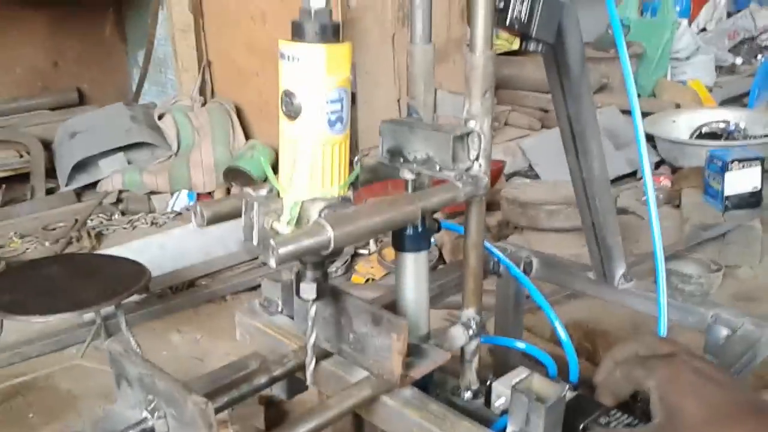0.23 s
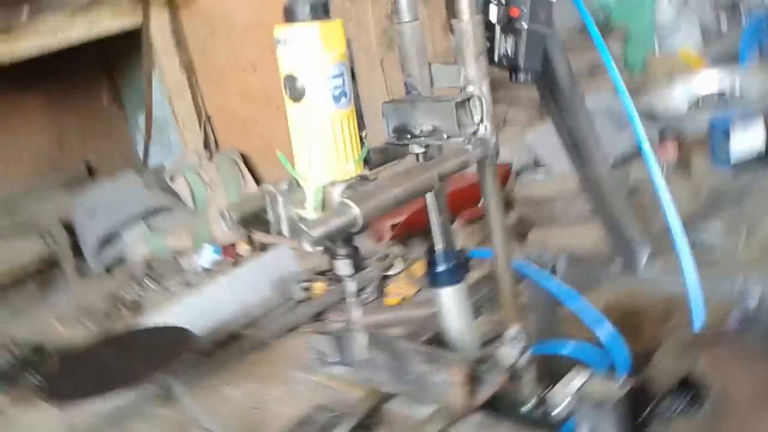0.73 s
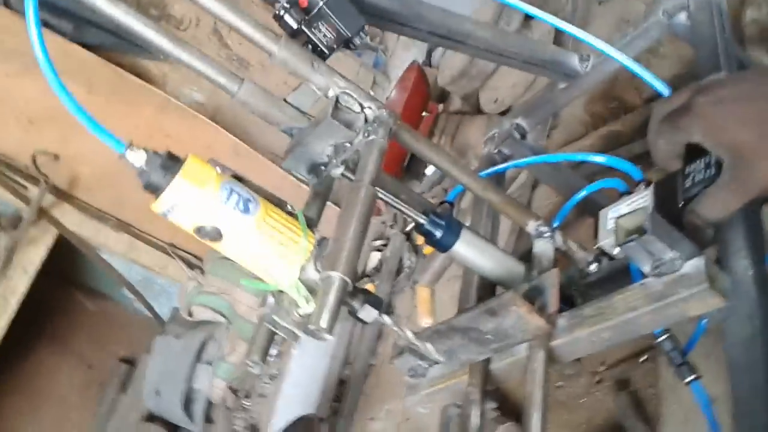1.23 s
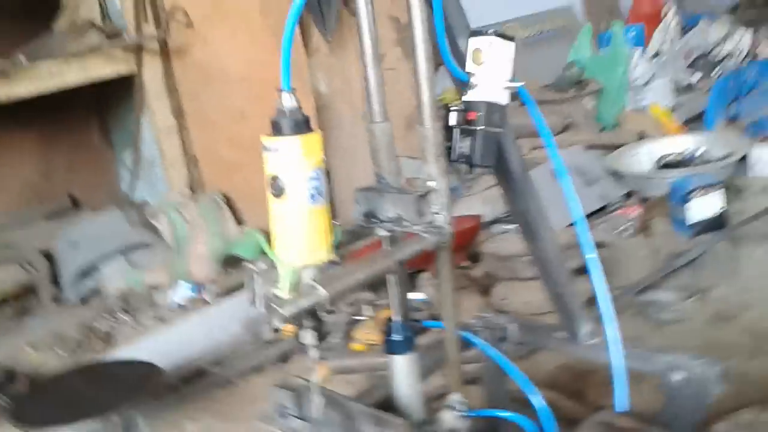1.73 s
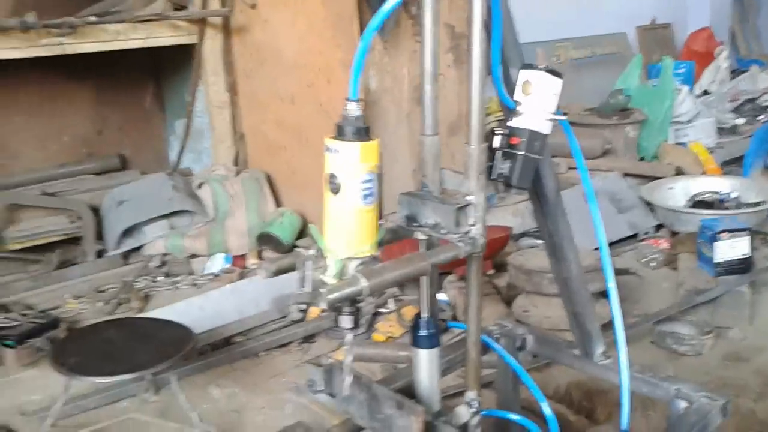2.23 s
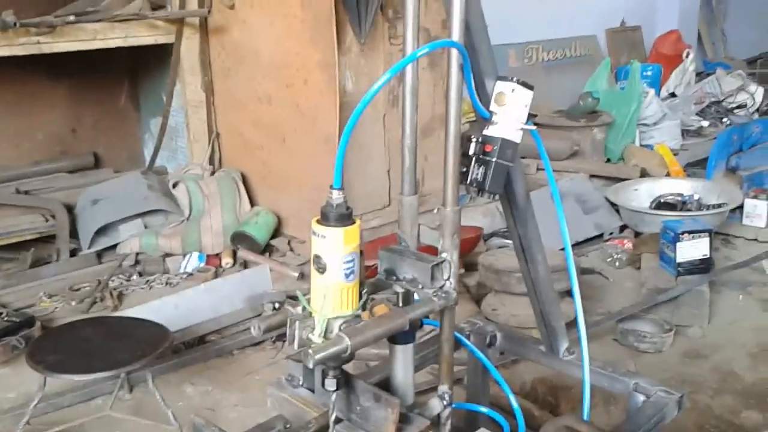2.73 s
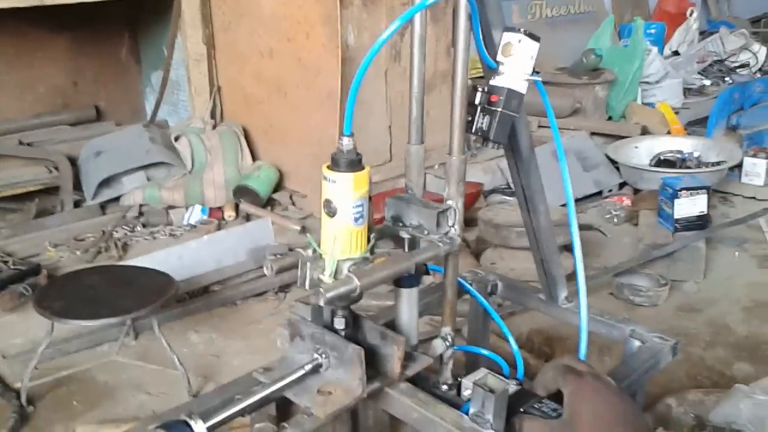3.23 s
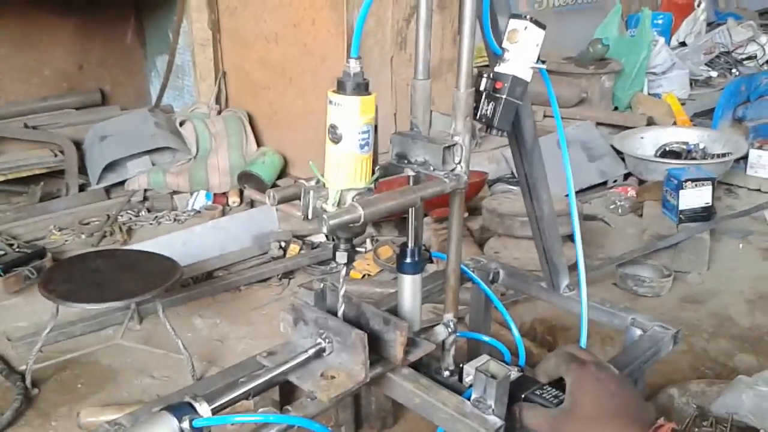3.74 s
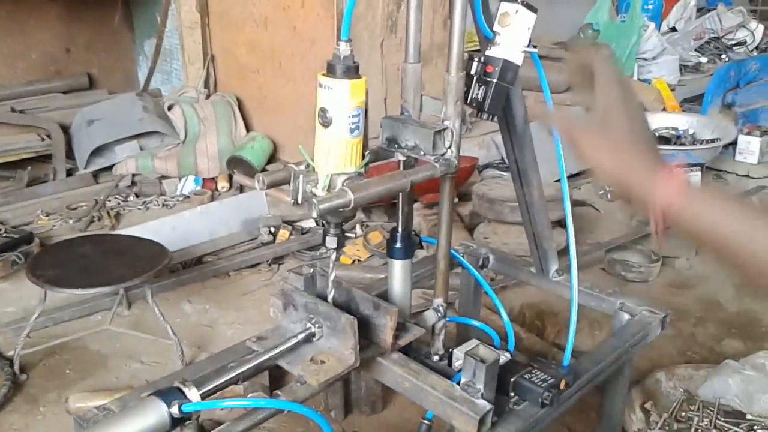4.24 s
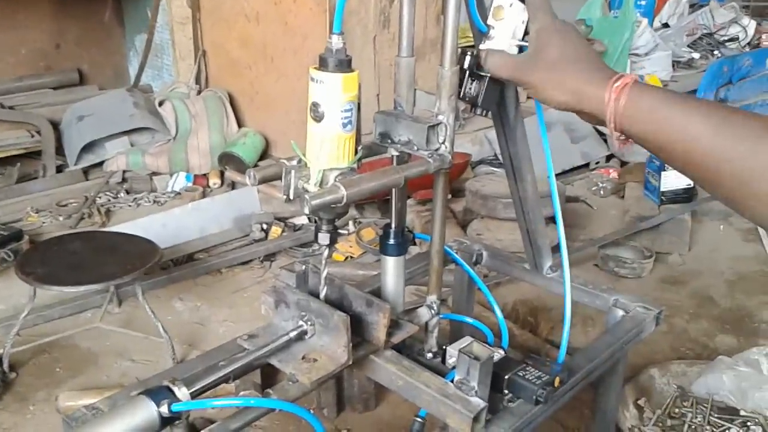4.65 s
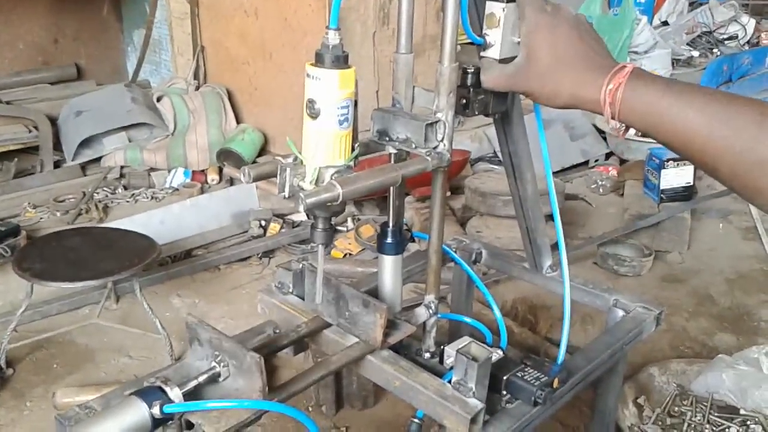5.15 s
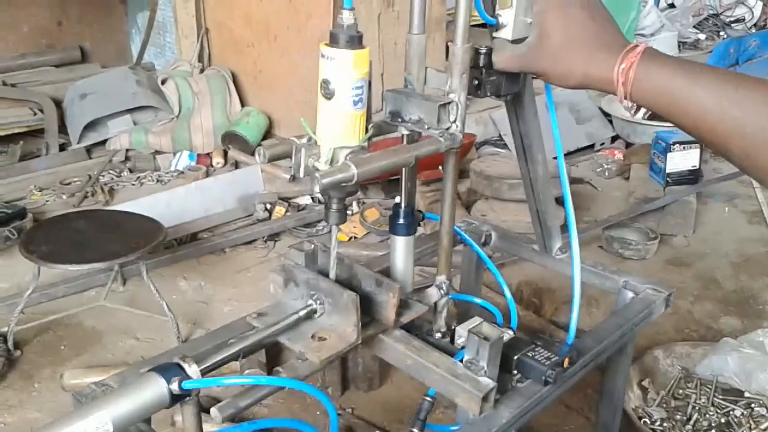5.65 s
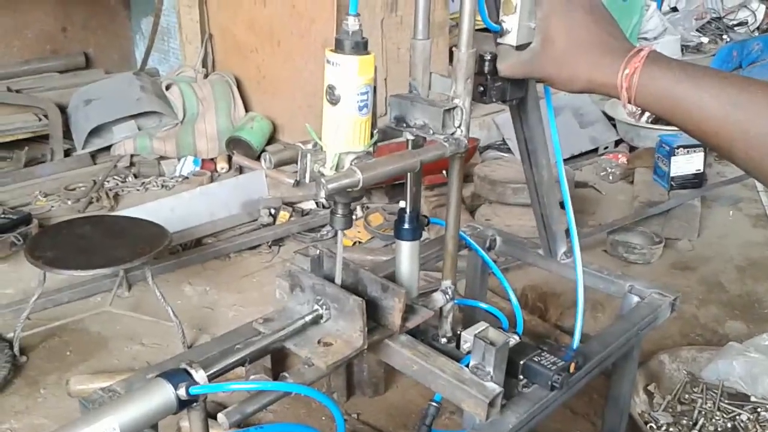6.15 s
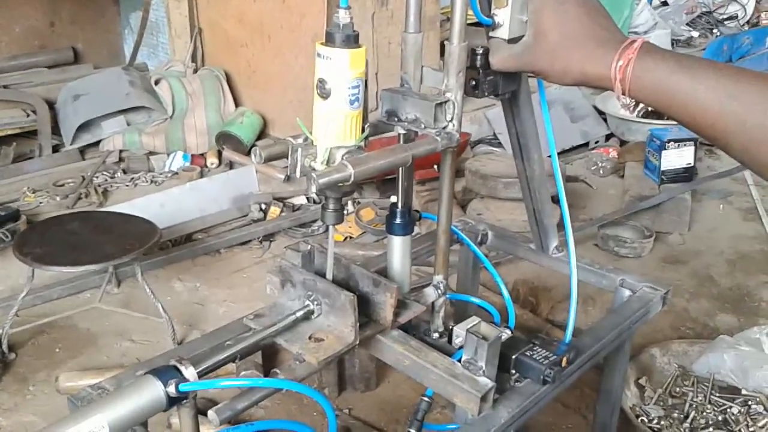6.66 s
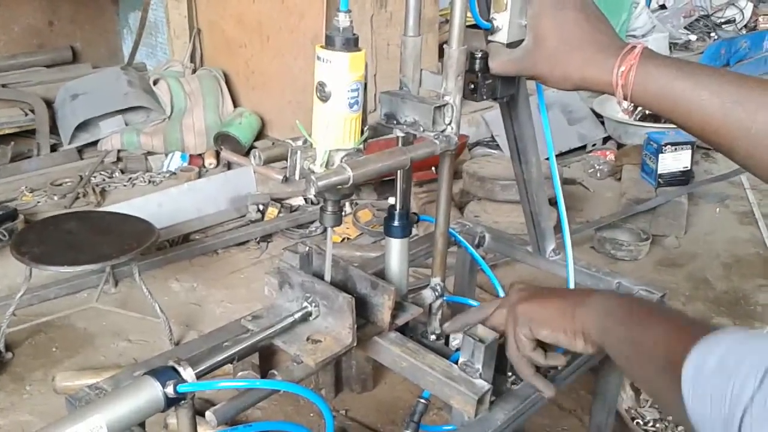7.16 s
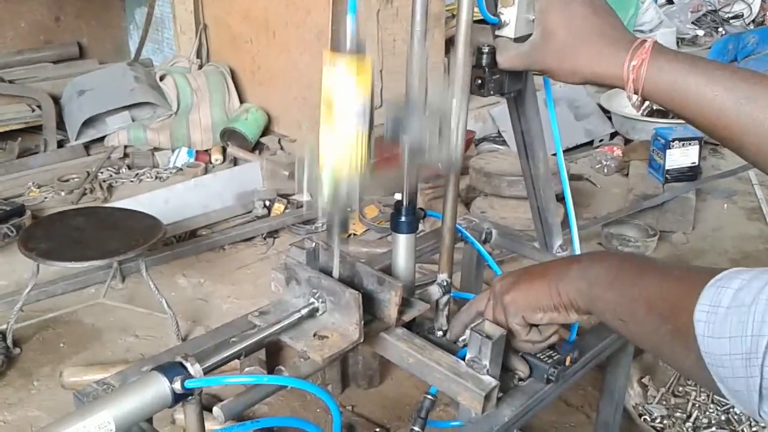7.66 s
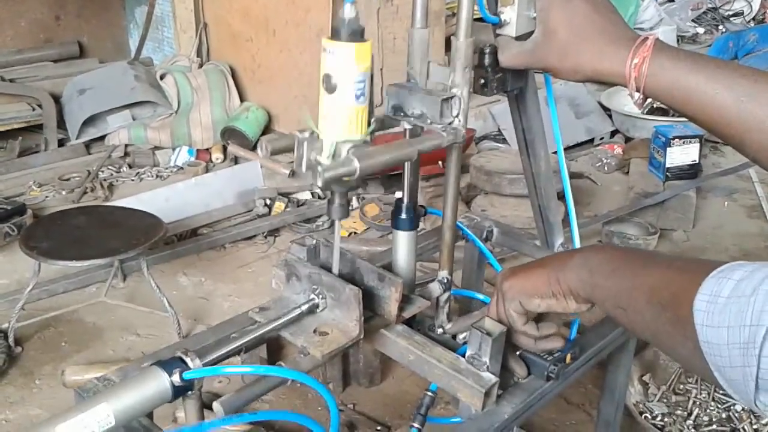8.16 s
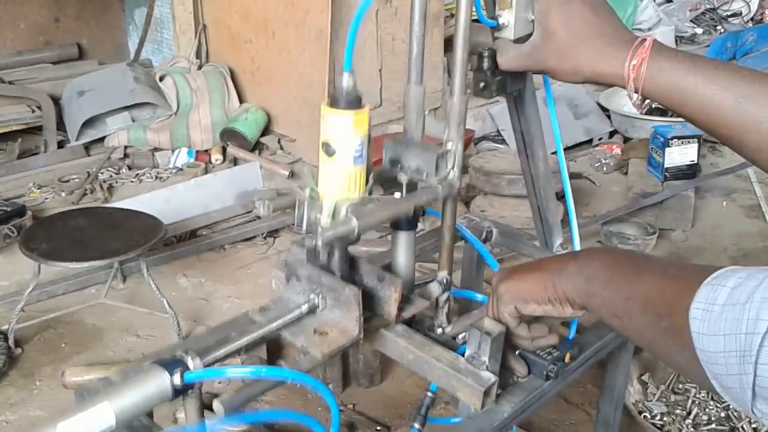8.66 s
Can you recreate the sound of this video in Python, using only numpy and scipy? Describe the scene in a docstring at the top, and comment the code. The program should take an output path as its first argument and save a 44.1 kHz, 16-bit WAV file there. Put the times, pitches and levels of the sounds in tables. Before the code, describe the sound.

A pneumatic drilling rig lets off sharp, irregular blasts of air close to the microphone in a workshop. Each valve spit is followed by a hissing cylinder exhaust and a short metal clank, with occasional juddering and faint high chirps. About halfway, an air drill whines in two short pulls, then runs steadily while more blasts come. A piston compressor throbs further off, swelling in the pauses.

```python
"""Sharp blasts of air from a home-made pneumatic drilling rig, close to one microphone in a workshop.
Each throw of a valve spits, then a cylinder exhausts and clanks on its stop; the frame judders and
faint chirps come and go. From five seconds in, the air drill whines in three pulls as its vanes chop
the exhaust. A piston compressor throbs further off. The recorder's gain control ducks at the blasts
and lets the compressor swell back in the pauses."""
import sys
import numpy as np
from scipy import signal
from scipy.fft import rfft, irfft, next_fast_len
from scipy.io import wavfile
from scipy.ndimage import uniform_filter1d, minimum_filter1d

SR = 44100
rng = np.random.default_rng(int(sys.argv[2]) if len(sys.argv) > 2 else 0)


def int16_out(signal):
    """Quantize to a 16-bit WAV file."""
    q = np.round(np.clip(np.atleast_2d(signal).T, -1, 1) * 32767)
    wavfile.write(sys.argv[1], SR, q.astype(np.int16))


N = 392049
TIME = np.arange(N) / SR
FULL_SPEED_HZ = 740   # vane rate to which the sounds of the coasting drill are scaled

# Cylinder strokes; wait and travel both count from the throw of the valve:
# thrown_s, valve_db, sizzle_db, knock_db, wait_s, exhaust_db, travel_s, stop_db
STROKES = [(-0.125, -3, -5, -12, 0.019, 9, 0.091, -16), (0.5149, -5.5, -7, -15.5, 0.052, -0.5, 0.115, -21),
           (2.4954, -3.5, -2, -14, 0.049, -1.5, 0.089, -22), (3.1155, -2, -16, -33, 0.047, -4, 0.064, -21),
           (3.455, -8.5, -14, -21.5, 0.052, -2, 0.12, -23.5),
           (4.9442, 3, -4.5, -8.5, 0.075, -2, 0.071, -24),
           (5.6733, -6, -18, -34, 0.046, -2.5, 0.065, -20.5), (7.796, -4, -9, -24.5, 0.064, -5, 0.072, -18),
           (8.2383, -12.5, -9, -37, 0.084, -6.5, 0.145, -23),
           (8.7599, -11.5, -7.5, -27.5, 0.066, -7.5, 0.066, -24)]


def air_blasts(start_s, jet_db, sizzle_db, thump_db, t60_s, sizzle_t60_s, thump_t60_s,
               rise_s, hold_s, wet_db):
    """Air escapes a port: the jet lasts while pressure falls, with a brief sizzle and a low thump."""
    # Spectra of the three parts of a blast: frequency_hz, level_db
    jet_spectrum = [(800, -29.5), (2000, -23.5), (3500, -12.5), (4800, -4.5), (5700, 7.5), (6400, 3.5),
                    (7500, -8.5), (9500, -17.5), (15000, -45)]
    sizzle_spectrum = [(4000, -3.5), (8000, -4), (10500, -6.5), (15000, -14.5)]
    thump_spectrum = [(30, -10), (120, 2.5), (350, 0.5), (900, 0.5), (2000, 2), (5000, -27)]
    jet = coloured(jet_spectrum) * bursts(start_s, jet_db, t60_s, rise_s, hold_s)
    sizzle = coloured(sizzle_spectrum) * bursts(start_s, sizzle_db, sizzle_t60_s, rise_s, hold_s / 2)
    thump = coloured(thump_spectrum) * bursts(start_s, thump_db, thump_t60_s, rise_s, hold_s)
    flutter = from_db(0.7 * drift(300))
    return workshop((jet + sizzle) * flutter, t60_s=0.57, wet_db=wet_db, dull_hz=7160) + thump


def air_drill(whine_db, jitter, waver_db, chop):
    """A four-vane rotor chops its exhaust: a whine of rotor orders over a hiss pulsing with each vane."""
    # Partials of the whine: rotor_multiple, level_db
    rotor_orders = [(1, -15.5), (2, -12), (3, -17), (4, 4), (6, -15), (7, -15), (8, -1.5), (9, -31),
                    (10, -13), (12, -12.5), (13, -27), (14, -18.5), (15, -10.5), (16, -2.5), (17, -18),
                    (18, -5), (19, -18), (20, 0), (21, -7.5), (22, -32), (23, -8.5), (24, 1), (25, -5.5),
                    (26, -28), (27, -30), (28, -3), (30, -22), (32, 2), (33, -19), (36, -2), (37, -30),
                    (38, -19)]
    # Resonances of the drill's casing: pitch_hz, width_hz, level_db
    casing_modes = [(2830, 97, -14), (3554, 46, -1), (4473, 98, 7)]
    # Spectrum of the drill's exhaust: frequency_hz, level_db
    hiss_spectrum = [(200, -25), (400, -20), (700, -11.5), (1000, -18), (1800, -7), (2400, -15),
                     (3300, -4.5), (4300, -13), (5400, 5.5), (6100, -1.5), (7000, 0.5), (7800, -22.5),
                     (8700, -10), (12000, -24), (15000, -25)]
    vane_hz, drive, upper, air = drill_motion()
    # the rotor runs unevenly while its speed changes fast
    slew_hz_per_s = uniform_filter1d(np.abs(np.gradient(vane_hz)) * SR, size=4000)
    surge = np.minimum(slew_hz_per_s / 250, 9)
    uneven_hz = vane_hz * (1 + jitter * (1 + surge) * drift(120))
    angle = 2 * np.pi * np.cumsum(uneven_hz) / SR / 4
    # high orders fall away, the vane multiples standing above the rest
    fizz = [(k, -11 - 17.5 * np.log2(k / 40) - 7 * (k % 4 > 0) + rng.normal(0, 3))
            for k in range(39, 77)]
    wavers = [from_db(waver_db * drift(14)) for _ in range(7)]
    bite = 0.98 * upper * np.minimum(vane_hz / 690, 1) ** 2.5   # upper orders need nearly full speed
    whine = np.zeros(N)
    for i, (k, db) in enumerate([*rotor_orders, *fizz]):
        partial = from_db(db) * wavers[i % len(wavers)] * np.sin(k * angle + rng.uniform(0, 2 * np.pi))
        whine += partial * bite if k > 10 else partial
    whine = rms_one(whine)
    # driven hard, the casing sings when an order meets one of its resonances
    casing = (upper / upper.max()) ** 2 * ring(whine, casing_modes)
    hiss = coloured(hiss_spectrum) * (1 + chop * np.cos(4 * angle))
    coasting = freewheel(angle, vane_hz, drive) + gear_rattle(vane_hz, drive, level_db=-26.5)
    return from_db(whine_db) * drive * (whine + casing) + air * hiss + coasting


def drill_motion():
    """The rotor spins up, then coasts. Gives vane rate and gains of drive, upper orders and exhaust."""
    # Trigger pulls: pressed_s, let_go_s, settled_hz, overshoot_hz, sag_hz_per_s,
    # drive_db, upper_db, air_db
    pulls = [(4.998, 5.545, 807, 49, 119.5, 1.5, -0.5, -28.5), (5.846, 5.945, 659.3, 0, -10, -6, 2, -30),
             (6.1419, 9.0, 766.1, 275, 23.5, 0.5, 1, -29.5)]
    spin_up_s, coast_s = 0.05, 0.16
    open_s, shut_s, release_s = 0.0079, 0.09, 0.0087   # air starts, air ends, drive is lost
    hose_drain_s = 0.1535   # pressure stored in the hose makes the rotor overshoot
    dip_hz, fill_s, recover_s = 36.74, 0.1, 0.19   # a filling cylinder robs the drill of air
    puff_db, puff_s = 6.5, 0.034   # extra air blows past the vanes until they seal
    vane_hz, drive, upper, air = np.zeros((4, N))
    for pressed, let_go, settled_hz, overshoot_hz, sag, drive_db, upper_db, air_db in pulls:
        held = np.minimum(since(pressed), let_go - pressed)
        after = since(let_go)
        running_hz = settled_hz + overshoot_hz * np.exp(-held / hose_drain_s) - sag * held
        for thrown, *_ in STROKES:
            if pressed < thrown < let_go:
                filling = np.minimum(since(thrown) / fill_s, 1)
                running_hz -= dip_hz * filling * np.exp(-since(thrown + fill_s) / recover_s)
        spin = (1 - np.exp(-held / spin_up_s)) * np.exp(-after / coast_s)
        vane_hz = np.maximum(vane_hz, running_hz * spin)
        opened = 1 - np.exp(-held / open_s)
        flow = opened * np.exp(-after / shut_s)
        drive += opened * np.exp(-after / release_s) * from_db(drive_db)
        upper += flow * from_db(upper_db)
        air += flow * from_db(air_db + puff_db * np.exp(-held / puff_s))
    return vane_hz, drive, upper, air


def gear_rattle(vane_hz, drive, level_db):
    """Without enough drive to grip, loose teeth tap the housing in rough step with the rotor."""
    # Resonances of the gear housing: pitch_hz, width_hz, level_db
    housing_modes = [(513, 140, 9.5), (685, 100, -2.5), (1404, 160, 3.5), (1620, 87, 5), (2710, 110, -2)]
    passes = np.floor(np.cumsum(vane_hz * (1 + 0.04 * drift(400))) / SR)
    taps = np.diff(passes, prepend=0) * from_db(2.9 * drift(300))
    scrape = 0.96 * rng.standard_normal(N)
    slack = np.sqrt(np.maximum(1 - drive, 0))
    gain = from_db(level_db) * slack * (vane_hz / FULL_SPEED_HZ) ** 1.88
    return gain * rms_one(ring(rms_one(taps) + scrape, housing_modes))


def freewheel(angle, vane_hz, drive):
    """Without drive the rotor sings on by itself, fading as it slows."""
    # Partials of the undriven rotor at full speed: rotor_multiple, level_db
    coasting_orders = [(4, -32), (8, -35), (16, -37)]
    song = sum(from_db(db) * np.sin(k * angle) for k, db in coasting_orders)
    return song * np.maximum(1 - drive, 0) * (vane_hz / FULL_SPEED_HZ) ** 2.9


def end_stops(start_s, level_db):
    """The carriage clanks against its stop, a dense and quickly damped ring."""
    # Spectrum of the clank: frequency_hz, level_db
    clank_spectrum = [(200, -38), (600, -2.5), (1100, 1), (1700, 3), (3000, 1), (7000, -16)]
    envelope = bursts(start_s, level_db, t60_s=0.18, rise_s=0.00087, hold_s=0.0036)
    return coloured(clank_spectrum) * envelope


def judder(slips_per_s, grind):
    """Uneven slips shake the steel frame, hardest early in each slide."""
    # Slides that shake the frame: start_s, length_s, level_db
    slides = [(0.729, 0.2, -28), (2.145, 0.22, -41), (4.621, 0.16, -44.5), (7.567, 0.19, -35),
              (7.722, 0.3, -35)]
    # Spectrum of the shaking frame: frequency_hz, level_db
    frame_spectrum = [(40, -33), (130, -4.5), (280, -2), (550, -6), (900, -9.5), (2500, -15), (8000, -37)]
    slips = (rng.random(N) < slips_per_s / SR) * rng.uniform(0.27, 1, N)
    shake = coloured(frame_spectrum, rms_one(slips) + grind * rng.standard_normal(N))
    envelope = sum(from_db(db) * np.interp(TIME, [s, s + 0.018, s + length / 3, s + length], [0, 1, 1, 0])
                   for s, length, db in slides)
    return shake * envelope


def high_chirps(width_hz, flicker_db):
    """Faint, short, mostly high-pitched clinks or chirps, each a noisy band in a soft hiss."""
    # Faint chirps: start_s, pitch_hz, level_db
    chirps = [(0.442, 6160, -43), (1.158, 9600, -54), (1.17, 2593, -43.5), (2.05, 9000, -48.5),
              (2.261, 7160, -44), (2.349, 9740, -47), (3.62, 9550, -49), (3.924, 9200, -47),
              (4.529, 8500, -56), (4.724, 7500, -50), (4.816, 7400, -41.5), (6.09, 8210, -48.5)]
    sound = np.zeros(N)
    for start_s, hz, db in chirps:
        span = slice(int(start_s * SR), int(start_s * SR) + SR)
        noise = rng.standard_normal(SR)
        band = rms_one(resonate(resonate(noise, hz, width_hz), hz, width_hz))
        hiss = 0.9 * rms_one(resonate(noise, hz=5700, width_hz=1100))
        sound[span] += (band + hiss) * bursts(start_s, db, t60_s=0.3, rise_s=0.005, hold_s=0.035)[span]
    return sound * from_db(flicker_db * drift(180))


def compressor(strokes_per_s, boom_hz, boom_db, rasp_db, wash_db):
    """Each intake stroke booms at the inlet and rasps through the pump, over a wash of machine noise."""
    # Resonances of the pump: pitch_hz, width_hz, level_db
    pump_modes = [(206, 20, -5.5), (288, 22, -1.5), (475.7, 18.4, 1.5), (870, 8, -3), (1857, 100, -7),
                  (2938, 51, -7.5), (4250, 77, -5.5), (5560, 67, -7.5)]
    # Spectrum of the machine noise in the shop: frequency_hz, level_db
    wash_spectrum = [(18, -61), (30, -30), (102, -11), (158, -12.5), (211, -1), (355, -20.5), (497, -11),
                     (662, -16.5), (1270, -20.5), (1870, -21.5), (2310, -21.5), (4780, -19.5),
                     (5730, -11.5), (12200, -48.5), (15000, -86)]
    turn = (TIME - 0.0314) * strokes_per_s
    from_peak_s = (turn - np.round(turn)) / strokes_per_s
    # the boom swells, then is cut off as the intake valve shuts
    intake = np.abs(np.cos(np.pi * turn + 0.72 * np.sin(np.pi * turn) ** 2)) ** 3.6
    phase = 2 * np.pi * boom_hz * from_peak_s + 0.5 * drift(22)
    boom = intake * np.sin(phase) * from_db(drift(8.8))
    rush = rng.standard_normal(N) * (intake + 1.1)   # the rasp carries on between strokes
    rasp = rms_one(ring(rush, pump_modes))
    wash = coloured(wash_spectrum) * (1 + 0.025 * np.cos(2 * np.pi * turn))
    return from_db(boom_db) * boom + from_db(rasp_db) * rasp + from_db(wash_db) * wash


def workshop(x, t60_s, wet_db, dull_hz):
    """Clutter in the room scatters a dense tail that is duller than the direct sound."""
    age = TIME[:SR]
    tail = rng.standard_normal(SR) * from_db(-60 * age / t60_s) * (age > 0.005)
    tail = signal.sosfilt(signal.butter(1, dull_hz, fs=SR, output="sos"), tail)
    tail /= np.sqrt(np.sum(tail ** 2))
    return x + from_db(wet_db) * signal.fftconvolve(x, tail)[:N]


def from_db(db):
    """Decibels to gain."""
    return 10 ** (np.asarray(db) / 20)


def rms_one(x):
    """Scale to unit rms."""
    return x / np.sqrt(np.mean(x ** 2) + 1e-20)


def since(start_s):
    """Seconds since a moment, zero before it."""
    return np.maximum(TIME - start_s, 0)


def coloured(spectrum, source=None):
    """White noise, or the given source, shaped by rows of frequency_hz, level_db; rms 1."""
    hz, db = np.transpose(spectrum)
    size = next_fast_len(N)
    source = rng.standard_normal(N) if source is None else source
    bin_hz = np.maximum(np.arange(size // 2 + 1) * SR / size, 1)
    low_cut = np.minimum(bin_hz / hz[0], 1) ** 2
    shape = from_db(np.interp(np.log(bin_hz), np.log(hz), db))
    return rms_one(irfft(rfft(source, size) * low_cut * shape, size)[:N])


def drift(rate_hz):
    """A random wander through `rate_hz` points a second; rms 1."""
    knots = rng.standard_normal(4096)
    return rms_one(np.interp(TIME * rate_hz, np.arange(len(knots)), knots))


def resonate(x, hz, width_hz):
    """A two-pole resonance with gain 1 at its peak."""
    r = np.exp(-np.pi * width_hz / SR)
    feedback = [1, -2 * r * np.cos(2 * np.pi * hz / SR), r * r]
    return signal.lfilter(np.array([1, 0, -1]) * (1 - r * r) / 2, feedback, x)


def ring(x, modes):
    """Parallel resonances from rows of pitch_hz, width_hz, level_db."""
    return sum(from_db(db) * resonate(x, hz, width) for hz, width, db in modes)


def bursts(start_s, level_db, t60_s, rise_s, hold_s):
    """Envelope of one or more bursts that open fast, hold briefly and die away."""
    envelope = np.zeros(N)
    for s, db in np.broadcast(start_s, level_db):
        span = slice(max(int(s * SR), 0), int(s * SR) + SR)
        age = np.maximum(TIME[span] - s, 0)
        fall_db = 60 * np.maximum(age - hold_s, 0) / t60_s
        envelope[span] += from_db(db - fall_db) * (1 - np.exp(-age / rise_s))
    return envelope


def gain_control(x, target_db, most_db, hold_s, release_s):
    """Quiet sound is lifted; a loud one drops the gain at once, and it waits before it creeps back."""
    step = SR // 1000
    power = uniform_filter1d(x ** 2, size=12 * step)[::step]
    level_db = 10 * np.log10(np.maximum(power, 1e-12))
    wanted_db = np.clip(target_db - level_db, 0, most_db)
    half_hold = int(hold_s * SR / step / 2)
    held_db = minimum_filter1d(wanted_db, 2 * half_hold + 1, origin=half_hold, mode="nearest")
    lift_db, creep = [0.], step / SR / release_s
    for limit in held_db:
        lift_db.append(min(limit, lift_db[-1] + creep * (limit - lift_db[-1])))
    return x * from_db(np.interp(np.arange(N) / step, np.arange(len(held_db)), lift_db[1:]))


def limiter(x, ceiling_db, recover_db_per_s, window):
    """Peaks are turned down just before they arrive, and the gain returns quickly."""
    over_db = np.maximum(20 * np.log10(np.abs(x) + 1e-9) - ceiling_db, 0)
    cut_db = np.maximum.accumulate(over_db + recover_db_per_s * TIME) - recover_db_per_s * TIME
    return x * from_db(uniform_filter1d(minimum_filter1d(-cut_db, size=window), size=window))


def scene():
    """The rig close by, the compressor further off, heard from one spot in the workshop."""
    thrown_s, valve_db, sizzle_db, knock_db, wait_s, exhaust_db, travel_s, stop_db = np.transpose(STROKES)
    valves = air_blasts(thrown_s, jet_db=valve_db + 3, sizzle_db=valve_db + sizzle_db + 4,
                        thump_db=knock_db, t60_s=0.11, sizzle_t60_s=0.066, thump_t60_s=0.035,
                        rise_s=0.0006, hold_s=0.011, wet_db=-15)
    exhausts = air_blasts(thrown_s + wait_s, jet_db=exhaust_db - 3, sizzle_db=exhaust_db - 14.5,
                          thump_db=exhaust_db - 25, t60_s=0.34, sizzle_t60_s=0.2278, thump_t60_s=0.46,
                          rise_s=0.0011, hold_s=0.0017, wet_db=-11.5)
    drill = air_drill(whine_db=-28.5, jitter=0.00194, waver_db=2, chop=0.53)
    chirps = high_chirps(width_hz=1200, flicker_db=2.5)
    clatter = end_stops(thrown_s + travel_s, stop_db) + chirps + judder(slips_per_s=180, grind=1.5)
    pump = compressor(strokes_per_s=10.113, boom_hz=214.8, boom_db=-35.5, rasp_db=-46.5, wash_db=-41)
    clatter = workshop(clatter, t60_s=1.0, wet_db=-9, dull_hz=8000)
    drill = workshop(drill, t60_s=0.97, wet_db=-19, dull_hz=5800)
    return np.tile(valves + exhausts + drill + clatter + pump, (2, 1))


def record(dry):
    """One microphone through gain control, a slow and a fast limiter and a steep top cut."""
    lifted = gain_control(dry[0], target_db=-11, most_db=20.5, hold_s=0.35, release_s=0.23)
    ducked = limiter(lifted, ceiling_db=7, recover_db_per_s=450, window=100)
    limited = limiter(ducked, ceiling_db=-0.3, recover_db_per_s=14000, window=8)
    top_cut = signal.ellip(10, 0.1, 90, 15300, fs=SR, output="sos")
    return np.tile(signal.sosfilt(top_cut, limited), (2, 1))


dry = scene()
out = record(dry)
int16_out(out)
```